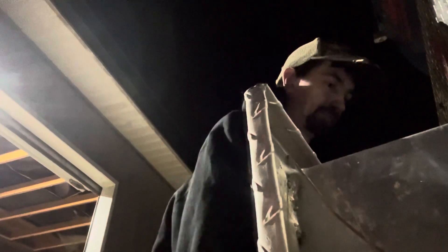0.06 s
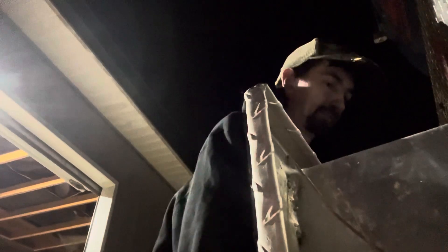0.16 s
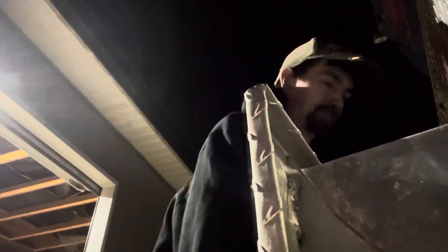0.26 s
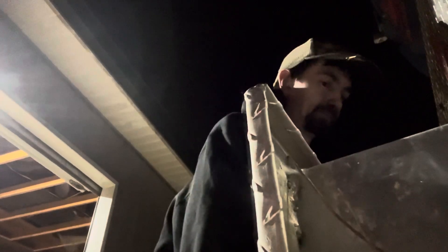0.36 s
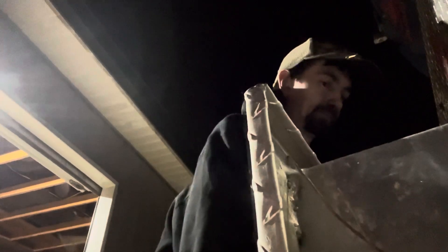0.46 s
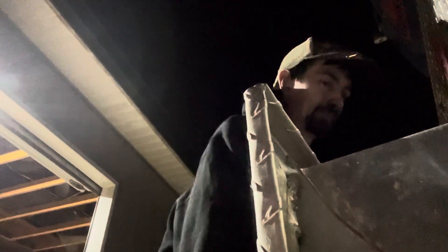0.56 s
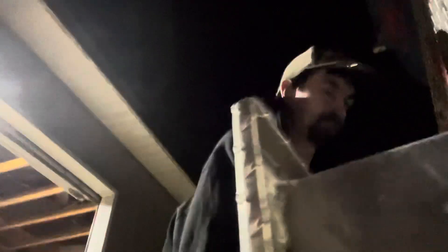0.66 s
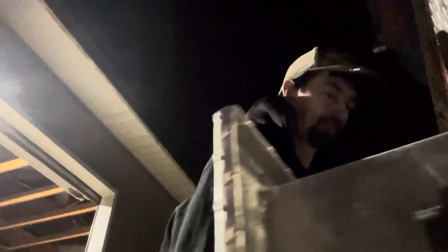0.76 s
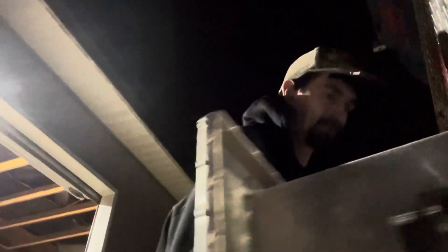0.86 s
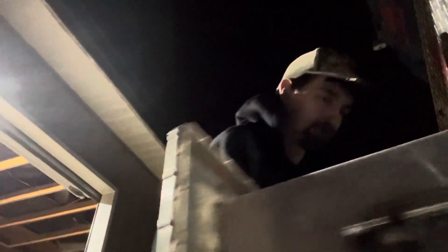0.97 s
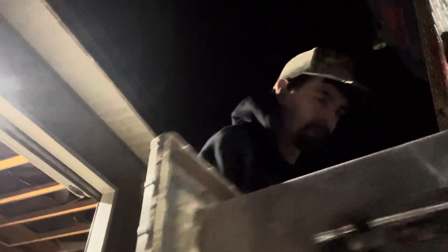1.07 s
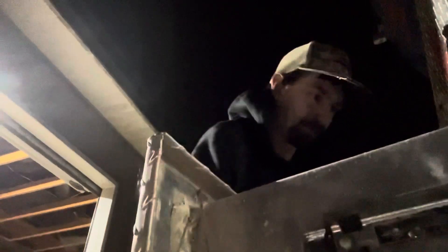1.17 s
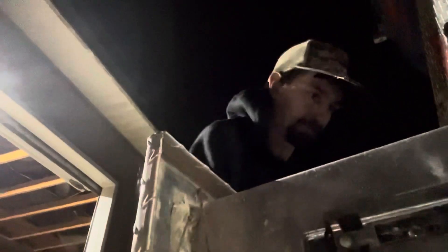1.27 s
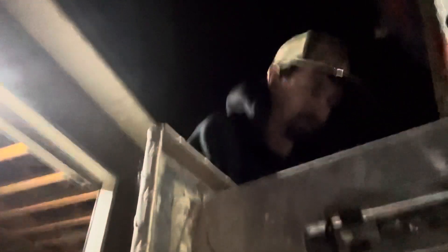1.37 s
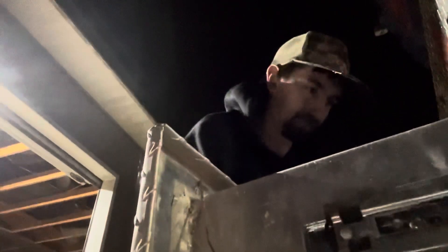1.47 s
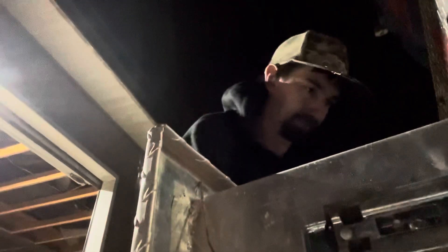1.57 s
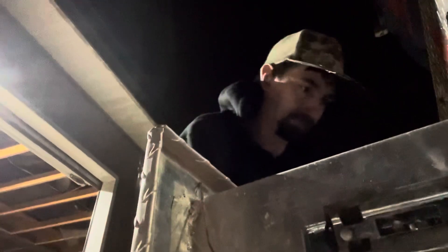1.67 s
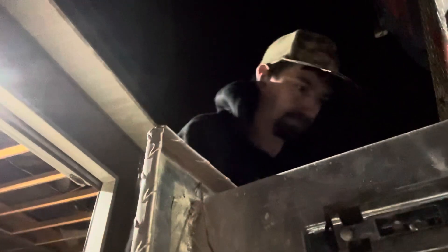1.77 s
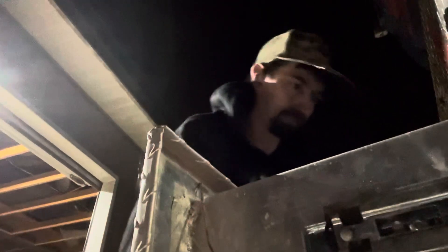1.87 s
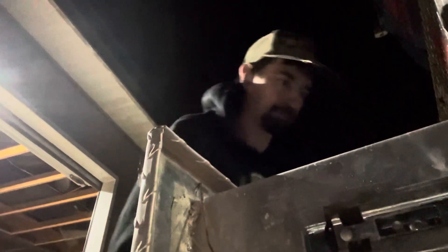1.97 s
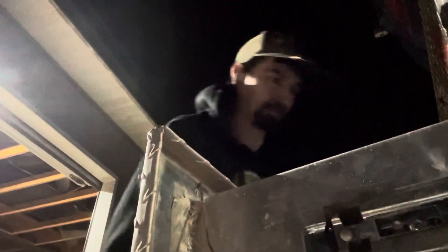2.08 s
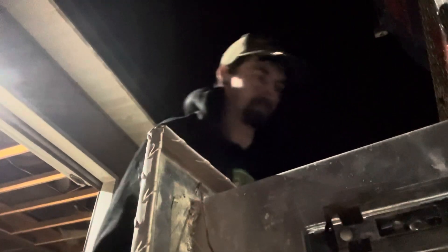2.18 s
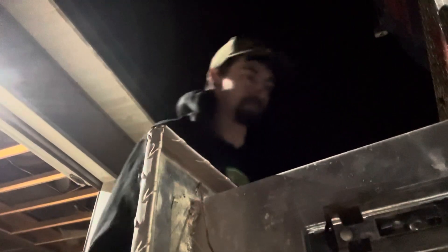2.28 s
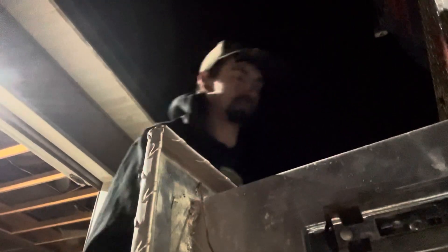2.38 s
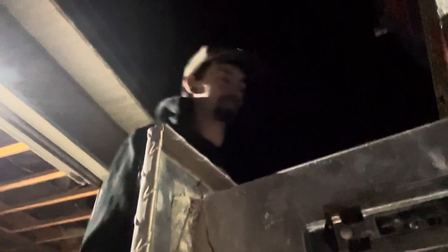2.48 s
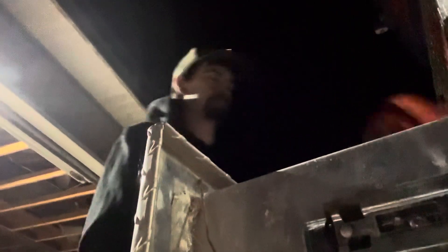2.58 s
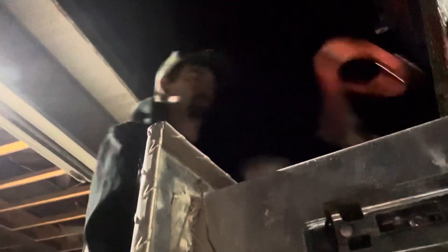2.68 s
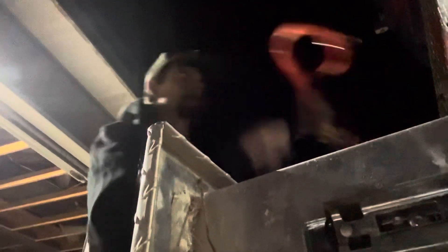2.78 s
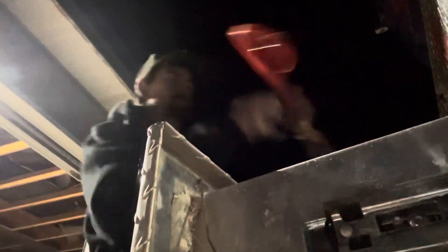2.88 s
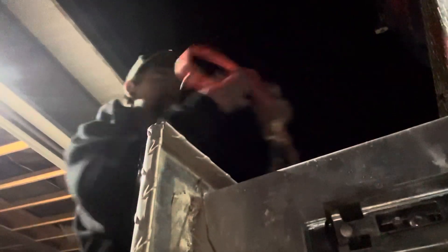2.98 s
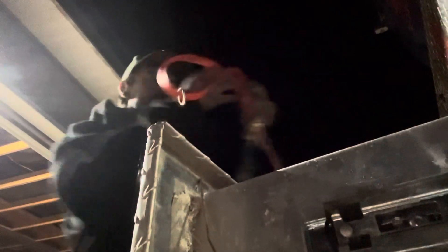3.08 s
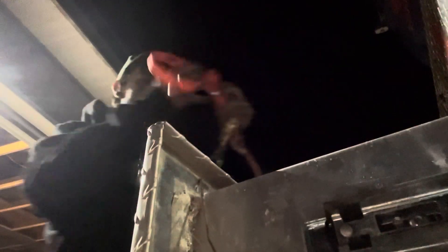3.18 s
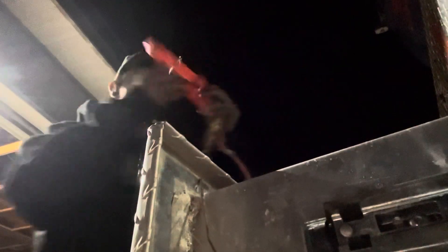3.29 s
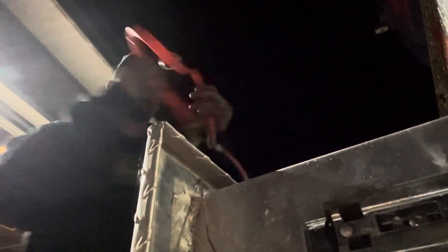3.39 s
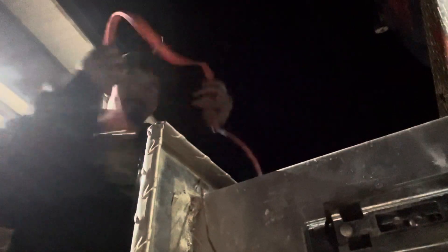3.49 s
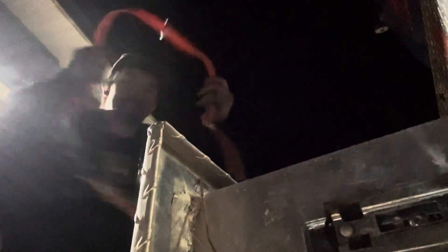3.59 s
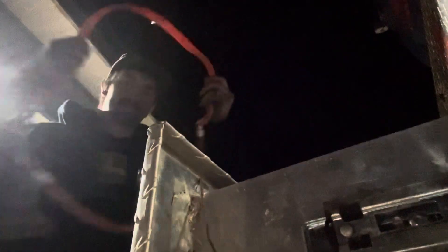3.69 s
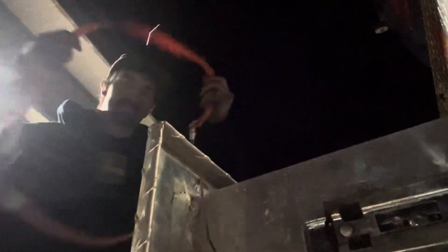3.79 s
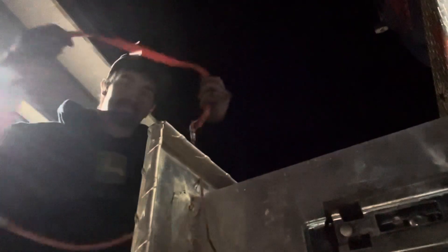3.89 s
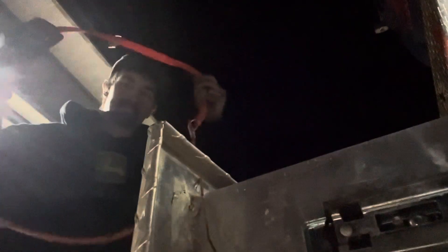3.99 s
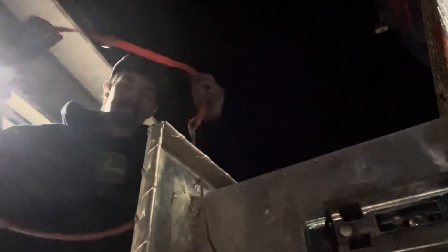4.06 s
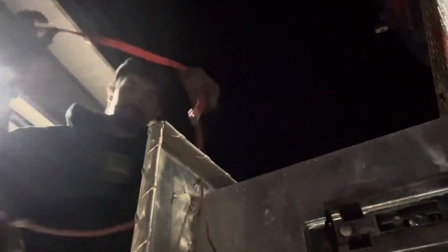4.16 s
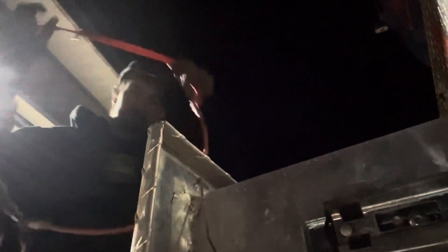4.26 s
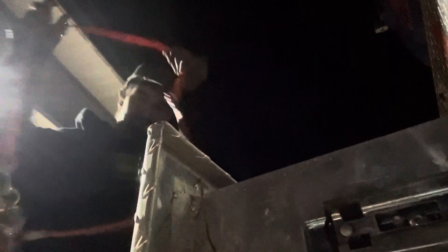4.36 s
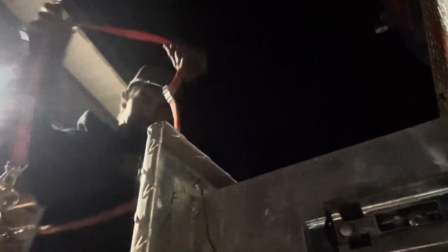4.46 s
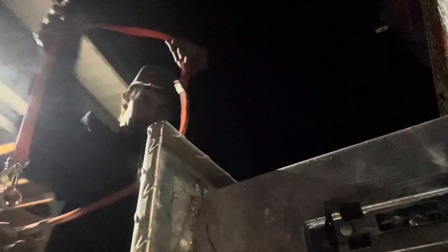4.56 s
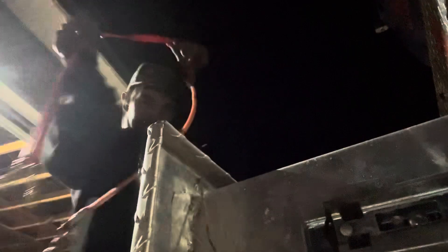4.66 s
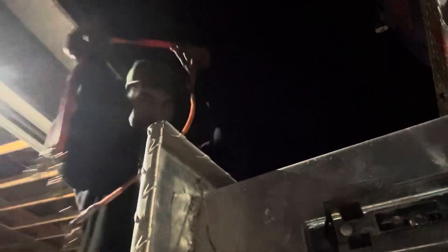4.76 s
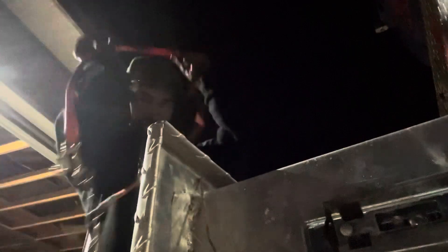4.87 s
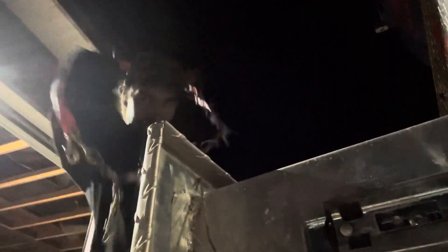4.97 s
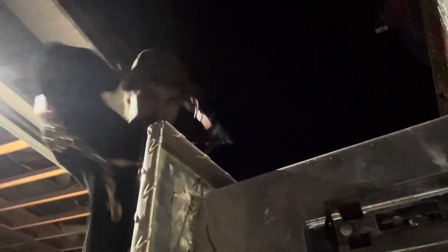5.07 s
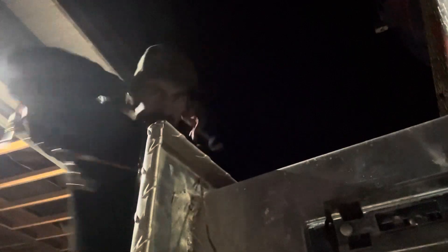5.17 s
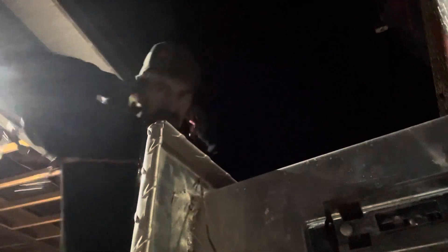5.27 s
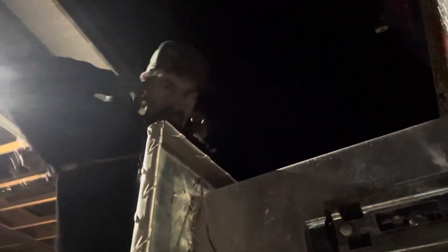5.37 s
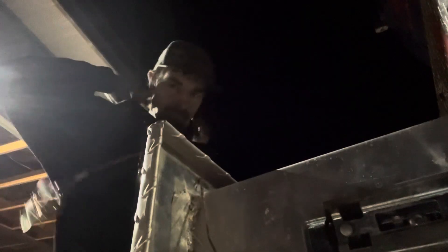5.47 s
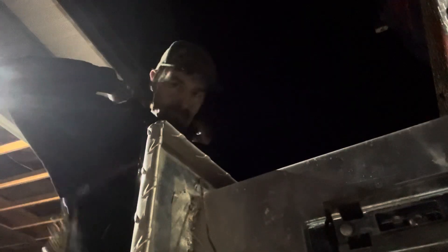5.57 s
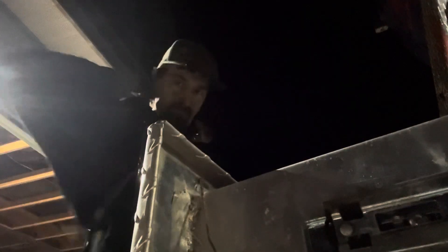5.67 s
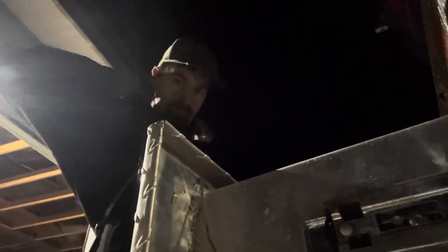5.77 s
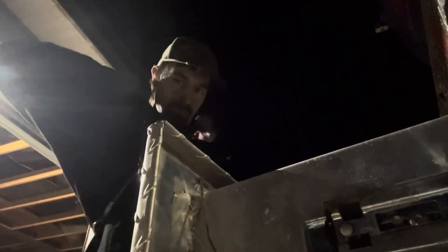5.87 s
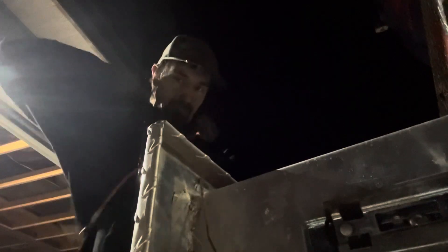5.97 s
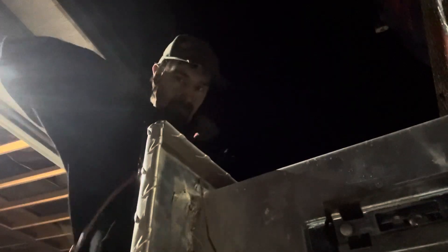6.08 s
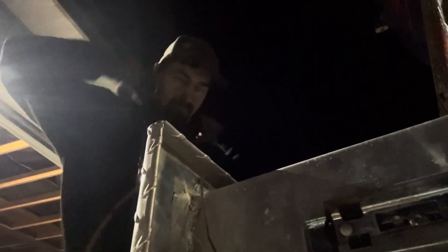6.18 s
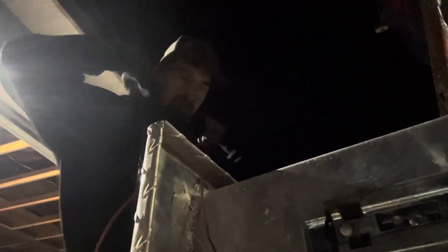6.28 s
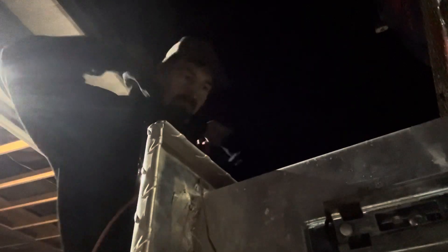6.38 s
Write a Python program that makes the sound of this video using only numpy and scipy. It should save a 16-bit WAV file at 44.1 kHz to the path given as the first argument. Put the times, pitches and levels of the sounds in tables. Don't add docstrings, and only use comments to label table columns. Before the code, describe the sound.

A quiet yard at night, captured close in stereo, with low distant traffic; a far car fades at the very start over a faint sheet metal hum. At 0.4 s a small knock, then from 0.55 to 1.2 s an aluminium tray drags out in a dense gritty roar with bright scratches, stopping with a clack and small clanks until 1.7 s. Hooks tick faintly around 1.8 s. At 2.26 s the door touches, a bolt squeaks, and at 2.33 s the latch slams very loudly, rebounding and ringing briefly. From 2.65 to 4 s a soft nasal dog whine rises slightly then sinks, while snap hooks clink at 3.3-4 s and strap rustles. A low motor hum slowly climbs; a distant car passes near 3.8 s. A bright jingle peaks at 5.4-5.6 s under a second, falling whine until 6.2 s. Hooks gather and cloth rustles from 6.05 s to the end.

```python
import sys
import numpy as np
from scipy import signal
from scipy.fft import rfft, irfft
from scipy.io import wavfile
from scipy.ndimage import map_coordinates

SR = 44100
rng = np.random.default_rng(int(sys.argv[2]) if len(sys.argv) > 2 else 0)


def store_pcm(level_fs):
    pcm = np.round(np.clip(level_fs, -1, 1) * 32767).astype(np.int16)
    wavfile.write(sys.argv[1], SR, np.atleast_2d(pcm).T)


def invert_db(level):
    return 10 ** (np.asarray(level, dtype=float) / 20)


N = 284004
HZ = np.fft.rfftfreq(N, 1 / SR) + 1e-3

# time in seconds, force as boom level in dB, sliding grit above boom in dB.
SHAKE = [
    [(0.41, -50.5, -8.5), (0.45, -52.5, -12), (0.506, -62, -2), (0.548, -34, -13), (0.648, -31, -3),
     (0.8, -27.5, -2.5), (0.9, -22, -3), (1.04, -22.5, -1.5), (1.1, -25.5, -10), (1.248, -37.5, -26.5),
     (1.324, -42, -9), (1.5, -47, -34.5), (1.75, -74, -26.5)],
    [(2.42, -38.5, -11.5), (2.95, -62, -11.5)],
    [(6.05, -64, -1.5), (6.252, -49, -5.5), (6.4, -71, -36)],
]
# pitch in Hz, level in dB per Hz.
SCRAPE_COLOUR = [(24, -48.5), (40, -33.5), (79, -12.5), (166, -5), (284, -2.5), (421, 0), (776, -14.5),
                 (2400, -24), (3380, -27.5), (3820, -27.5), (9460, -30.5), (12200, -36.5), (12800, -34),
                 (13300, -66)]
# pitch in Hz, level in dB, time to fade by 60 dB in seconds.
HOOK_MODES = [(3780, -30.5, .06), (5960, -26, 0.084), (7500, -16.5, 0.059), (9300, -13, 0.017),
              (9320, -9.5, .08), (9765, -13.5, 0.029), (10200, -10, 0.025), (10200, -8, 0.05),
              (11400, -28.5, .04), (15600, -22, .08)]
KNOCK_DB = [-11.5, -8.5, -11, -37.5, -2.5]


def rms_one(x):
    return x / np.sqrt(np.mean(x ** 2) + 1e-20)


def in_time(tables, fade_s=0.0094):
    s, *columns = np.concatenate(tables).T
    t = np.arange(N) / SR
    gate = 0
    for rows in tables:
        start, end = rows[0][0], rows[-1][0]
        gate = gate + np.interp(t, [start - fade_s, start, end, end + fade_s], [0, 1, 1, 0])
    return [gate] + [np.interp(t, s, column) for column in columns]


def at_hz(points):
    hz, value = np.array(points).T
    return np.interp(np.log(HZ), np.log(hz + 1e-3), value)


def colour(x, spectrum):
    return rms_one(irfft(rfft(x) * invert_db(at_hz(spectrum)), N))


def band(x, low_hz, high_hz):
    return signal.sosfilt(signal.butter(3, [low_hz, high_hz], "band", fs=SR, output="sos"), x)


def drift(rate):
    points = rng.standard_normal(int(N / SR * rate) + 3)
    return map_coordinates(points, [np.arange(N) / SR * rate], order=3)


def ring(clicks, hz, t60):
    r, w = invert_db(-60 / (t60 * SR)), 2 * np.pi * hz / SR
    return signal.lfilter([0, np.sin(w)], [1, -2 * r * np.cos(w), r * r], clicks + 1e-18)


def grains(per_s, spread_db):
    sizes = invert_db(spread_db * np.minimum(rng.exponential(1, N), 4)) * rng.standard_normal(N)
    return sizes * (rng.random(N) < per_s / SR)


def dying(at_s, db, t60, rise_s):
    t = np.arange(int(1.3 * t60 * SR)) / SR
    out = np.zeros(N + len(t))
    for s, height in zip(at_s, invert_db(db)):
        out[round(s * SR):][:len(t)] += height * (1 - np.exp(-t / rise_s)) * invert_db(-60 * t / t60)
    return out[:N]


def bells(x, rows):
    return sum(height * np.exp(-.5 * ((x - centre) / half) ** 2) for centre, half, height in rows)


def swells(rows):
    t = np.arange(0, N + 100, 100) / SR
    return np.interp(np.arange(N) / SR, t, bells(t, [(s, half_s, invert_db(db)) for s, db, half_s in rows]))


def shaken(table):
    gate, db = in_time([table], fade_s=0.046)
    return gate * invert_db(db)


def ports(x, phase, balance_db, echo_db, echo_s):
    t = np.arange(int(echo_s * SR)) / SR
    scatter = rng.standard_normal((2, len(t))) * invert_db(-40 * t / echo_s)
    scatter *= invert_db(echo_db) / np.sqrt(np.sum(scatter ** 2, axis=1, keepdims=True))
    left = np.exp(1j * phase) * invert_db(balance_db / 2)
    right = np.ones(len(HZ)) * invert_db(-balance_db / 2)
    direct = np.array([left, right])
    return irfft(rfft(x) * (direct + rfft(scatter, N) * np.abs(direct)), N)


def drag():
    # pitch in Hz, width in Hz, level in dB.
    wall_modes = [(169, 540, -1), (460, 70, -3), (1248, 46, -9.5), (2200, 170, -24.5)]
    gate, boom_db, scrape_db = in_time(SHAKE, fade_s=0.016)
    at_rest = np.arange(N) / SR > 2.0
    rumble_db = -9 - .25 * scrape_db - 7.5 * at_rest
    body_db = 0.17 * scrape_db - 1.5
    hiss_db = np.clip(-4.5 + 1.74 * scrape_db, -41, -12)
    layers = [(55, 160, rumble_db), (160, 700, body_db), (700, 3200, scrape_db), (3200, 14000, hiss_db)]
    out = 0
    for low, high, db in layers:
        grit = grains(5000, spread_db=0.5) * invert_db(1.4 * drift(90))
        walls = sum(invert_db(wall_db) * rms_one(ring(grit, hz, 0.96 / width)) for hz, width, wall_db in wall_modes)
        roar = colour(grit, SCRAPE_COLOUR) + invert_db(-20.0) * walls
        out = out + invert_db(db) * rms_one(band(roar, low, high))
    return gate * invert_db(boom_db) * out


def snags():
    # time in seconds, peak level in dB.
    catches = [(0.4044, -71), (0.4637, -62), (0.492, -55), (0.54, -53), (0.5884, -32), (0.623, -27),
               (0.6577, -28.5), (0.677, -27), (0.6954, -29.5), (0.7256, -35.5), (0.827, -22), (1.074, -28),
               (1.082, -29), (1.302, -69), (1.3272, -69)]
    s, db = np.transpose(catches)
    scratch = rms_one(band(colour(rng.standard_normal(N), SCRAPE_COLOUR), 5100, 14000))
    return scratch * dying(s, db - 6, 0.041, rise_s=.0004)


def panel(level, hz, width_hz):
    return level * rms_one(ring(rng.standard_normal(N), hz, 1.6 / width_hz))


def side_panel():
    # time in seconds, level in dB, time to fade by 60 dB in seconds.
    panel_knocks = [
        (0.0, -45, 0.78),
        (0.17, -50.5, 0.92),
        (2.344, -42.5, 0.45),
        (2.46, -53, 4),
    ]
    release_db_per_s, drive_db, max_db = 29.5, -7.5, -34
    gate, force_db, _ = in_time(SHAKE[:1])
    fall_db = release_db_per_s * np.arange(N) / SR
    push_db = np.minimum(force_db + drive_db, max_db) - 100 * (gate < 1)
    level = invert_db(np.maximum.accumulate(push_db + fall_db) - fall_db)
    for s, db, t60 in panel_knocks:
        level = level + dying([s], np.array([db]), t60, rise_s=0.015)
    return panel(level, 181.5, 29)


def lid():
    # time in seconds, level in dB.
    lid_shakes = [
        (6.08, -69),
        (6.164, -47),
        (6.36, -55.5),
    ]
    return panel(shaken(lid_shakes), 213.7, 6.1)


def mesh():
    # time in seconds, level in dB.
    shivers = [
        (2.43, -51),
        (2.46, -63.5),
        (2.86, -70.5),
    ]
    creeps = [
        (2.12, -96),
        (2.2, -72),
        (2.25, -62),
    ]
    return panel(shaken(shivers) + shaken(creeps), 2100, 230)


def door():
    # time in seconds, peak level in dB, treble above peak in dB, bass above peak in dB.
    blows = [(0.402, -38, -24, -5), (0.563, -22, -31, -24), (1.155, -46, -29.5, 29),
             (1.304, -41.5, -14, -10), (1.334, -40.5, -22, 2.5), (1.665, -50, -20, -9),
             (1.708, -58.5, -1, -2), (2.2605, -22, -11.5, -6), (2.2645, -21.5, -18, -2.5),
             (2.322, -36, -4, 10), (2.3295, -12.5, 1, -2), (2.332, -3, -27, -14.5), (2.3365, -18, -3, -3),
             (2.341, -26, -14, 3.5), (2.347, -14, 2.5, 4), (2.354, -20, -7, -3), (2.3625, -24, -2, -13),
             (2.371, -32, -4, -6), (2.386, -20, -9, -2), (3.437, -38.5, -14, -11), (3.46, -44.5, 2, -9),
             (3.522, -43.5, 0, -6.5), (4.287, -61.5, 3, -9.5), (4.882, -52.5, -3.5, -6),
             (4.903, -49, -3.5, 6), (5.327, -41, -14, -23), (6.084, -52, 18, -33), (6.203, -49, 8, 4),
             (6.25, -58, 15.5, 2)]
    # pitch in Hz, level in dB, time to fade by 60 dB in seconds.
    door_modes = [(192, 2, 0.5), (357, 5, 0.54), (430, 5, 0.25), (533.2, 1, 0.27), (742, -8, 0.2),
                  (1049, -1.5, 0.23), (1244, -5, 0.2), (1553, -3.5, 0.18), (1623, -8, 0.26),
                  (1976, -19, 0.068), (2266, -2, 0.17), (2310, -20.5, 0.2), (2782, -25, 0.043),
                  (3360, -22, 0.21), (4040, -23, 0.71), (4270, -26, 0.33), (5350, -16.5, 0.62),
                  (6700, -16.5, 0.19), (7250, -22.5, 0.32), (8200, -24.5, 0.083), (8700, -17.5, 0.12)]
    s, db, treble_db, bass_db = np.transpose(blows)
    white = rng.standard_normal((3, N))
    out = rms_one(band(white[0], 920, 2700)) * dying(s, db - 15.0, 0.09, rise_s=0.0036)
    out += rms_one(band(white[1], 4200, 12000)) * dying(s, db + treble_db - 6.0, 0.033, rise_s=0.00032)
    out += rms_one(band(white[2], 2300, 7500)) * dying(s, db + treble_db - 42.5, 0.52, rise_s=0.0049)
    out += rms_one(band(white[1], 300, 640)) * dying(s, db + bass_db - 10.0, 0.1, rise_s=0.00096)
    out += rms_one(band(white[0], 6700, 8300)) * dying(s, db + treble_db - 10.5, 0.042, rise_s=0.0003)
    luck = rng.normal(0, 1, (len(s), len(door_modes)))
    for k, (hz, mode_db, mode_t60) in enumerate(door_modes):
        clicks = np.zeros(N)
        share_db = bass_db if hz < 800 else (treble_db - 8.5) * (hz > 4000)
        clicks[np.round(s * SR).astype(int)] = invert_db(db + share_db + mode_db - 22.5 + luck[:, k])
        out += ring(clicks, hz, min(0.92 * mode_t60, .4))
    pop = np.sin(2 * np.pi * 922 * np.arange(N) / SR) * dying([.5635], np.array([-12]), 0.016, rise_s=0.0014)
    return band(out + pop, 150, 16000)


def snaps(tables, knocks_db):
    # pitch in Hz, level in dB per Hz.
    crack_colour = [(3240, -22), (5500, -7), (7590, -4.5), (8130, -9.5), (8830, -0.5), (10200, -5),
                    (12200, -8), (13200, -13.5), (14800, -13.5), (15600, -6.5), (16300, -11.5),
                    (16600, -42)]
    # start in seconds, end in seconds.
    free_spans = [(5.38, 5.43), (5.46, 5.48), (5.54, 5.57)]
    free_t60, held_t60 = .45, .035
    touches = []
    for rows, knock in zip(tables, knocks_db):
        touches += [tuple(row) + (knock,) for row in rows]
    s, db, hz, ring_db, knock_db = np.transpose(sorted(touches))
    knock_db = knock_db - .25 * (ring_db + 14)
    bright = colour(rng.standard_normal(N), crack_colour)
    out = bright * (dying(s, db - 5.5, 0.0092, rise_s=0.00019) + dying(s, db - 30.0, 0.058, rise_s=0.0022))
    dull = rms_one(band(rng.standard_normal(N), 3400, 6300))
    out += dull * dying(s, db + knock_db, 0.014, rise_s=.0002)
    modes = np.array(HOOK_MODES)
    luck = rng.normal(0, 1, (len(s), 2, len(modes), 1))
    t = np.arange(int(.2 * SR)) / SR
    rings = np.zeros(N + len(t))
    for k, free_s in enumerate(np.diff(s, append=9)):
        shifted_hz = modes[:, :1] * (1 + 0.025 * luck[k, 0])
        fading = invert_db(modes[:, 1:2] + 4.0 * luck[k, 1] - 80 * t / modes[:, 2:])
        others = np.sum(fading * np.sin(2 * np.pi * shifted_hz * t), axis=0)
        t60 = free_t60 if any(a < s[k] < b for a, b in free_spans) else held_t60
        tones = invert_db(-60 * t / t60) * np.sin(2 * np.pi * hz[k] * t) + others
        damped = invert_db(db[k] + ring_db[k] - 1900 * np.maximum(t - free_s, 0))
        rings[round(s[k] * SR):][:len(t)] += damped * tones * (1 - np.exp(-t / .0004))
    return out + rings[:N]


def latch():
    # time in seconds, peak level in dB, ring pitch in Hz, ring above peak in dB.
    cracks = [
        (1.1362, -25.5, 9400, -12),
        (2.2596, -31.5, 7920, -24.5),
        (2.3305, -2, 7500, -10.5),
        (2.35, -16, 7400, -16.5),
    ]
    return band(snaps([cracks], KNOCK_DB[:1]), 4200, 8700)


def bolt():
    # time in seconds, level in dB.
    slides = [
        [(1.95, -74), (1.966, -73.5), (2.25, -73.5)],
        [(2.295, -69.5), (2.319, -42.5), (2.325, -31.5)],
    ]
    gate, db = in_time(slides, fade_s=0.0036)
    return gate * invert_db(db) * rms_one(ring(grains(7500, spread_db=-1.5), 7200, 0.011))


def lead_hooks():
    # time in seconds, peak level in dB, ring pitch in Hz, ring above peak in dB.
    pick_up = [(1.784, -54.5, 10030, -6), (1.837, -52.5, 10100, -1.5), (1.8746, -51, 10200, -13),
               (1.89, -46.5, 10800, -0.5), (1.941, -54, 10600, -5), (2.6311, -36, 9700, -12),
               (2.6807, -38.5, 9350, -21), (3.1378, -52.5, 10060, -28)]
    untangle = [(3.341, -29, 10640, -19), (3.36, -31.5, 11400, -29), (3.437, -48, 8200, -18),
                (3.46, -35, 9600, -19), (3.482, -32, 8800, -26), (3.5219, -22.5, 7820, -11),
                (3.5374, -43, 8550, -8), (3.605, -37, 9100, -18), (3.641, -55, 9170, -29),
                (3.667, -38, 9700, -15), (3.788, -37, 9400, -18), (3.834, -29, 8830, 0.5),
                (3.8549, -46.5, 9000, 0), (3.8846, -42, 10300, -9), (3.956, -42, 10100, -8),
                (3.966, -43.5, 9800, -19), (4.016, -58.5, 10230, -17.5)]
    swing = [(4.882, -41, 8950, -8), (5.1113, -47, 9360, -18), (5.338, -52.5, 10200, -9),
             (5.3737, -47, 8420, -19), (5.38, -44, 10300, -17), (5.394, -27, 9320, -26.5),
             (5.422, -18, 9320, -9.5), (5.4486, -30.5, 9680, 2), (5.473, -26.5, 9300, -14),
             (5.4752, -33, 10200, -22), (5.538, -38, 10200, -6), (5.5389, -30, 9640, 0),
             (5.5448, -31, 10110, 6.5), (5.549, -35, 9030, 5), (5.5546, -38.5, 10200, 5),
             (5.5615, -50, 9120, 0), (5.594, -35, 10200, -6), (5.637, -45, 9550, -11)]
    gather = [(6.007, -49, 9600, -26), (6.06, -61, 10280, -11), (6.085, -27.5, 6700, -28),
              (6.098, -43, 9400, -11), (6.102, -32.5, 9770, -7), (6.148, -42, 7000, -20),
              (6.204, -31.5, 7750, -12), (6.218, -42, 8960, -3.5), (6.252, -37, 8860, -27),
              (6.288, -41, 9700, -11.5), (6.302, -44, 9300, -13), (6.318, -44, 9000, -10)]
    return snaps([pick_up, untangle, swing, gather], KNOCK_DB[1:])


def jingle():
    # time in seconds, level in dB.
    chatter = [
        [(1.78, -75), (1.902, -64), (2.05, -75)],
        [(3.35, -48), (3.38, -65), (3.45, -76), (3.49, -53), (3.53, -68), (3.58, -65)],
        [(5.33, -67), (5.42, -63), (5.43, -34), (5.455, -47), (5.49, -51.5), (5.535, -68), (5.55, -39),
         (5.58, -51), (5.64, -65)],
        [(6.0, -56), (6.09, -56), (6.104, -36), (6.135, -46), (6.2, -70), (6.21, -44.5), (6.285, -45.5),
         (6.33, -62.5), (6.4, -70.5)],
    ]
    link_scales = [1, .9, .42]
    gate, db = in_time(chatter)
    modes = []
    for k, scale in enumerate(link_scales):
        modes += [(scale * hz, mode_db - 5.1 * k, t60) for hz, mode_db, t60 in HOOK_MODES[2:8]]
    touches = grains(2200, spread_db=1.5) * invert_db(2.5 * drift(60))
    dealt = rng.integers(0, len(modes), N)
    rings = 0
    for k, (hz, mode_db, t60) in enumerate(modes):
        rings = rings + invert_db(mode_db) * ring(touches * (dealt == k), hz, 0.53 * t60)
    smallest_spring = invert_db(-3) * rms_one(ring(touches, 15700, 0.043))
    return gate * invert_db(db - 4.5) * (rms_one(rings) + smallest_spring)


def rustle():
    # time in seconds, level in dB, half length in seconds.
    moves = [(2.05, -78, 0.45), (2.7, -82.5, 0.39), (3.52, -71.5, 0.12), (3.75, -64, 0.16),
             (4.23, -67.5, 0.057), (4.5, -72, 0.43), (5.15, -82.5, 0.14), (5.5, -66.5, 0.24),
             (5.75, -77, 0.27), (6.24, -60.5, 0.086)]
    # pitch in Hz, level in dB per Hz.
    cloth_colour = [(1470, -45.5), (2500, -10), (3320, -7.5), (3800, -10.5), (6210, 2), (7340, -10.5),
                    (9550, -9.5), (12500, -11), (13300, -35.5), (16000, -42), (17000, -90)]
    fine = colour(grains(8000, spread_db=-0.5), cloth_colour)
    parts = 0
    for low, high in [(2200, 5000), (5000, 8000), (8000, 16200)]:
        parts = parts + invert_db(1.6 * drift(35)) * band(fine, low, high)
    return swells(moves) * parts


def dog():
    # time in seconds, pitch in Hz, effort in dB.
    whines = [
        [(2.64, 760, -72), (2.85, 763, -67.5), (2.975, 801, -58), (3.1, 793.5, -60), (3.33, 769.5, -61.5),
         (3.55, 756, -57.5), (3.77, 726.5, -58.5), (3.88, 713, -60.5), (4.0, 696, -70)],
        [(5.35, 770.4, -65), (5.5, 762, -59), (5.6, 752.3, -57.5), (5.72, 726, -57.5), (5.96, 702, -57),
         (6.07, 671, -59), (6.2, 620, -86)],
    ]
    # pitch in Hz, level in dB.
    throats = [
        [(1430, -21), (1520, -23), (1620, -14), (2300, 0), (2740, -20), (2880, -13), (2980, -9), (3060, -22),
         (3200, -30), (3640, -36), (3950, -16), (4700, -40), (5600, -26)],
        [(1430, -25), (1620, -26), (2300, 0), (2800, -13), (2980, -9), (3060, -18), (3500, -30), (3800, -9),
         (4700, -40), (5600, -36)],
    ]
    # time in seconds, half length in seconds, change in dB.
    voice_breaks = [(3.42, .016, -18), (3.497, .004, -14), (3.6, .02, -8), (3.71, .006, -10),
                    (5.44, .006, -10)]
    # time in seconds, half length in seconds, change in dB.
    main_dips = [(2.836, .006, -12), (2.866, .005, -12), (2.905, .015, -9), (3.02, .02, -14),
                 (3.115, .025, 5), (3.15, .007, -8), (3.214, .007, -15), (3.256, .01, -10),
                 (3.303, .007, -13), (3.348, .012, -6), (3.384, .012, 3), (3.66, .04, -8),
                 (5.34, .012, -10), (5.432, .008, -16), (5.53, .008, -8), (5.635, .022, -13),
                 (5.685, .005, -8), (5.79, .012, -6), (5.87, .01, -7), (6.01, .01, -8)]
    # pitch in Hz, half width in Hz, change in dB.
    kennel_nulls = [(2224, 8, -10), (2251, 9, -14), (2328, 14, -11), (2432, 16, -15)]
    partials = [2, 3, 4, 5, 7]
    hoarse_from_s = [3.87, 6.12]
    open_s = [3.04, 5.43]
    gate, pitch, effort_db = in_time(whines, fade_s=0.053)
    t = np.arange(N) / SR
    effort_db = effort_db + bells(t, voice_breaks)
    second_whine = t > whines[1][0][0] - .5
    hoarse = np.clip((t - np.where(second_whine, hoarse_from_s[1], hoarse_from_s[0])) / .05, 0, 1)
    mouth_shut = t < np.where(second_whine, open_s[1], open_s[0])
    turn = 2 * np.pi * np.cumsum(pitch * (1 + .0018 * drift(60))) / SR
    out = invert_db(-83 + 2 * drift(8)) * rms_one(ring(rng.standard_normal(N), 4250, .008))
    for k in partials:
        first, second = [np.interp(k * pitch, *np.transpose(throat)) for throat in throats]
        db = effort_db + np.where(second_whine, second, first)
        flicker_db = 2.5
        if k == 3:
            db = db + bells(3 * pitch, kennel_nulls) * second_whine + bells(t, main_dips)
            flicker_db = 1.5
        if k == 4:
            db = db - 14 * mouth_shut
        if k > 4:
            blur = drift(160)
        else:
            blur = (1 - hoarse) * (1 + .08 * k * drift(90)) + hoarse * drift(200)
        out = out + np.sqrt(2) * invert_db(db + flicker_db * drift(18)) * blur * np.sin(k * turn)
    return gate * out


def car():
    # time in seconds, level in dB.
    passes = [
        [(0.0, -50), (0.124, -64), (0.3, -65)],
        [(3.3, -71.5), (3.77, -57), (4.4, -72.5)],
    ]
    gate, db = in_time(passes, fade_s=0.15)
    return gate * invert_db(db) * rms_one(band(rng.standard_normal((2, N)), 160, 510))


def night():
    # pitch in Hz, level in dB per Hz.
    traffic_colour = [(15, -59.5), (25, -38.5), (48, -0.5), (114, -4), (144, -7), (168, -9), (225, -13.5),
                      (252, -13.5), (444, -16.5), (489, -14.5), (680, -21.5), (876, -16.5), (2600, -47),
                      (3380, -74.5), (5720, -120)]
    # pitch in Hz, likeness of left and right from 0 to 1.
    likeness = [(60, 0.82), (250, 0.6), (600, 0.066), (5000, .1), (9000, 0.58)]
    alike = np.clip(at_hz(likeness), 0, 1)
    mid, side = rfft(rng.standard_normal((2, N))) * invert_db(at_hz(traffic_colour))
    lag = np.exp(-2j * np.pi * np.minimum(HZ, 300) * 18 / SR)
    left = (np.sqrt(1 + alike) * mid + np.sqrt(1 - alike) * side) * lag
    right = np.sqrt(1 + alike) * mid - np.sqrt(1 - alike) * side
    traffic = rms_one(irfft(np.array([left, right]), N))
    traffic = traffic * invert_db(-54.5 + drift(3.3)) * invert_db(np.array([[-.7], [.7]]))
    since = np.arange(N) / SR - 2.8
    hz, db = 135.4 + 2.5 * since, -61 + 1 * since
    motor = np.sqrt(2) * invert_db(db + drift(1.96)) * np.sin(2 * np.pi * np.cumsum(hz) / SR)
    hum = np.clip(10 * since, 0, 1) * motor
    return traffic + hum * invert_db(np.array([[-1.2], [1.2]]))


def self_noise():
    # time in seconds, level in dB.
    hiss_levels = [(0, -77.5), (0.35, -89), (1.4, -96), (1.75, -80.5), (2.3, -79.5), (4.0, -75), (4.3, -87),
                   (5.2, -77), (6.44, -76)]
    # pitch in Hz, level in dB per Hz.
    hiss_colour = [(1180, -32.5), (2000, -10), (2770, -18), (3500, -10.5), (4810, -10.5), (12700, -27.5),
                   (13300, -55), (22000, -120)]
    _, db = in_time([hiss_levels])
    white = np.array([colour(w, hiss_colour) for w in rng.standard_normal((2, N))])
    edges = np.geomspace(900, 16500, 9)
    out = 0
    for low, high in zip(edges, edges[1:]):
        flutter_db = 7.7 * np.minimum(drift(16), .8) + 1.4 * np.minimum(drift(4), .8)
        out = out + invert_db(flutter_db) * band(white, low, high)
    return invert_db(db) * out


def kennel_box():
    # pitch in Hz, phase in radians.
    box_phase = [(0, 0), (860, -3.3), (1890, -4.7), (3450, -9.9), (3880, -12.0), (4390, -12.9),
                 (5000, -15.8), (5770, -15.2), (6460, -13.4), (7320, -14.9), (8440, -12.8), (11600, -12.4),
                 (12500, -9.5), (16700, -9.3)]
    # pitch in Hz, left minus right in dB.
    box_balance = [(60, -3.5), (110, -4), (200, -6.5), (380, -8.5), (700, -7), (1290, -9), (2380, -2.5),
                   (4400, -8.5), (8120, -2), (15000, 2.5)]
    # pitch in Hz, level in dB.
    far_end = [(60, -8.5), (200, -15), (700, -7), (1500, -5.5), (3000, -0.5), (5500, 0), (8000, -11)]
    phase = np.interp(HZ, *np.transpose(box_phase))
    sheets = side_panel() + lid() + mesh()
    metal = drag() + snags() + sheets + door() + bolt() + latch()
    out = ports(metal, phase, at_hz(box_balance), echo_db=-9.0, echo_s=.08)
    out[0] += irfft(rfft(drag() + door()) * invert_db(at_hz(far_end)), N)
    return out


def scene():
    ahead = 2 * np.pi * HZ * 4.58 / SR
    hooks = ports(lead_hooks() + jingle() + rustle(), ahead, -.8, echo_db=-10, echo_s=.025)
    whine = ports(dog(), 0 * HZ, 4.5, echo_db=-14, echo_s=.1)
    return kennel_box() + hooks + whine + car() + night()


def band_limit(x):
    return signal.sosfilt(signal.butter(12, 17160, fs=SR, output="sos"), x)


def record(dry):
    rounded = 1.6 * np.tanh((dry + self_noise()) / 1.6)
    top_cut = signal.cheby2(10, 60, 17000, fs=SR, output="sos")
    return band_limit(signal.sosfilt(top_cut, rounded))


dry = scene()
out = record(dry)
store_pcm(out)
```